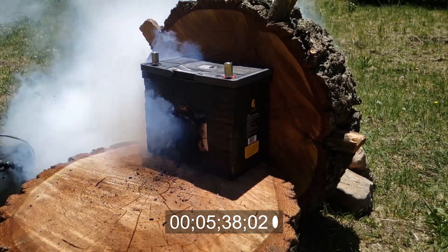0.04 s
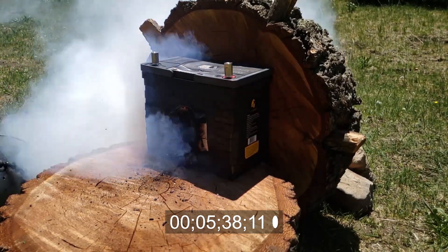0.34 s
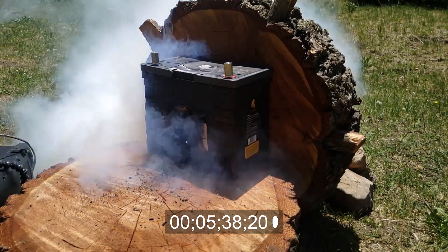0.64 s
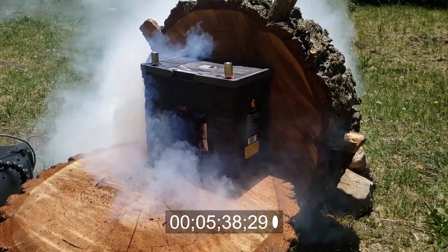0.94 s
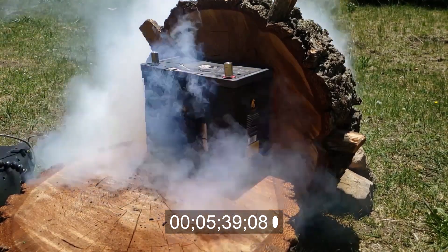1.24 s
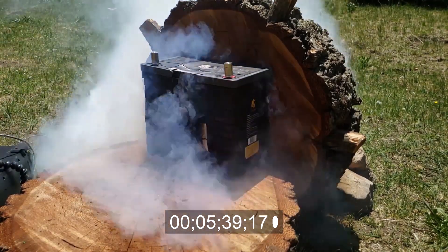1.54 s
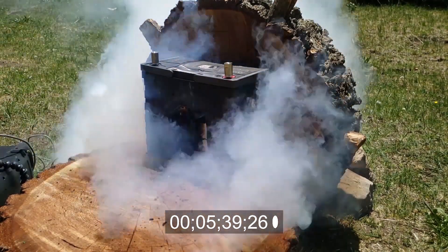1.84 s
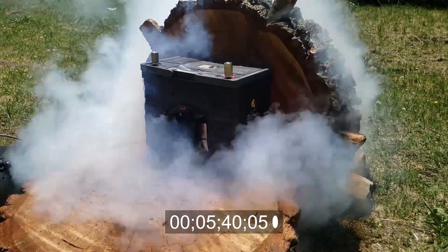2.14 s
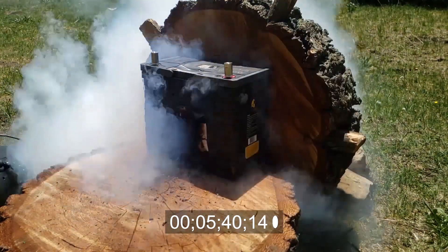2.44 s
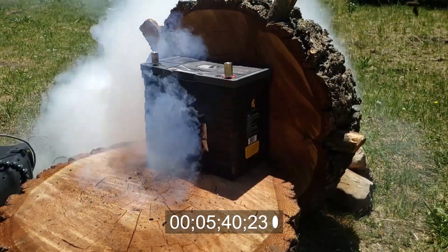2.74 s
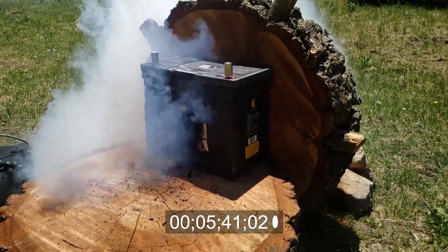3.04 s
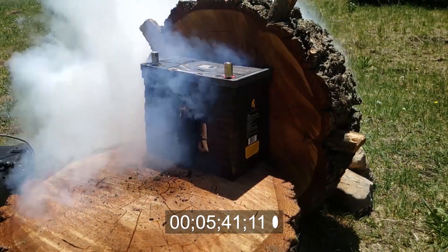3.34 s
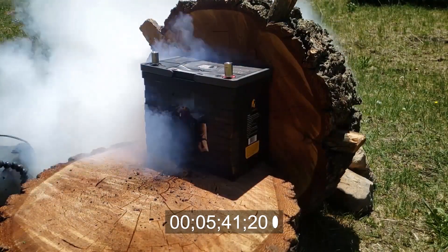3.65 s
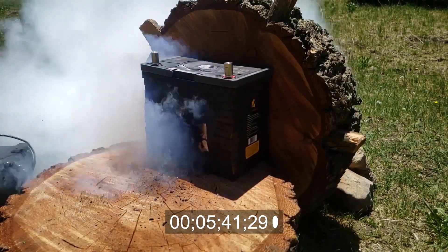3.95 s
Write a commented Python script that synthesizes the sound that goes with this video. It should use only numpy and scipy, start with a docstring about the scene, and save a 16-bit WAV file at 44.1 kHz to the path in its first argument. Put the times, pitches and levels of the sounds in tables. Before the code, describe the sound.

A loud, sputtering hiss of gas from a burning battery jumps up at about 0.1 seconds and continues throughout. A lower roar swells beneath it, easing by 1.4 seconds. Rough, high whistles come and go at different pitches, and from about 3 seconds thinner ones glide downward until the end at 4 seconds. Light wind buffets the microphone with soft, low thumps.

```python
"""Burning battery venting outdoors

Hot gas jets from the cracks in a loud, sputtering hiss whose colour shifts as the jets change.
Under it runs a lower roar that swells in the first second. Narrow gaps sing in rough whistles
that sink toward the end. The hiss reaches the left microphone port first; light wind buffets both."""
import sys
import numpy as np
from scipy import signal
from scipy.fft import rfft, irfft, next_fast_len
from scipy.io import wavfile
from scipy.ndimage import uniform_filter1d, map_coordinates

SR = 44100
rng = np.random.default_rng(int(sys.argv[2]) if len(sys.argv) > 2 else 0)


def transcribe(signal):
    """Save signal, clipped to [-1, 1], as a 16-bit WAV file at the path in sys.argv[1]."""
    frames = np.atleast_2d(signal).T
    limited = np.clip(frames, -1, 1)
    pcm = np.round(limited * 32767).astype(np.int16)
    wavfile.write(sys.argv[1], SR, pcm)


N = 176400
TIME = np.arange(N) / SR


def amp(db):
    """Decibels to gain."""
    return 10 ** (np.asarray(db) / 20)


def unit(x):
    """Scale to rms 1."""
    return x / np.sqrt(np.mean(x ** 2) + 1e-20)


def along(points, hz):
    """Read a curve of (f/Hz, value) points on a log frequency axis."""
    freqs, values = np.transpose(points)
    return np.interp(np.log(hz + 1), np.log(freqs + 1), values)


def curves(rows):
    """One envelope for each column after the time."""
    times, *columns = np.transpose(rows)
    return [np.interp(TIME, times, column) for column in columns]


def wobble(rate_hz):
    """A smooth random modulator with rate_hz knots a second."""
    return map_coordinates(rng.standard_normal(N // 8), [TIME * rate_hz])


def filtered(x, response):
    """Shape x with a complex frequency response."""
    size = next_fast_len(N + 8192)
    return irfft(rfft(x, size) * response(np.fft.rfftfreq(size, 1 / SR)), size)[..., :N]


def rush(spectrum, patchy_db=1.28):
    """Turbulent flow: two unrelated coloured noises with shared, drifting patches of gain."""
    bins = signal.stft(rng.standard_normal((2, N)), nperseg=512)[2]
    patches = uniform_filter1d(rng.standard_normal(bins.shape[1:]), size=8, axis=0)  # across frequency
    patches = uniform_filter1d(patches, size=14, axis=1)  # across time
    pair = signal.istft(bins * amp(patchy_db * unit(patches)), nperseg=512)[1][:, :N]
    return unit(filtered(pair, lambda hz: amp(along(spectrum, hz))))


# Jet colour on either side of the shift: f/Hz, early level/dB, late level/dB
JET_COLOUR = [(1750, -36, -36), (2250, -12.5, -15), (2800, -7.3, -9.5), (3300, -3.1, -4.2),
              (3900, -4.4, -3.5), (4400, -3.0, -5.0), (5200, -7.2, -10.2), (6300, 0.0, -2.0),
              (7150, -4.5, -0.8), (7700, -13.5, -10.9), (8200, -18.2, -17.3), (9000, -13.2, -11.6),
              (10200, -8.2, -6.6), (11550, -16.3, -9.6), (12800, -7.0, -11.3), (14000, -12.4, -10.5),
              (15600, -11.8, -11.7)]
# Crossovers between the four hiss bands: f/Hz
CROSSOVERS = [4700, 7800, 11500]
# Band faders: t/s, low level/dB, middle level/dB, high level/dB, top level/dB
HISS_FADERS = [(0, -29.5, -35.2, -32.7, -32.4), (0.07, -24.7, -29.4, -30.5, -26.8),
               (0.12, -20, -17.8, -15.8, -20.4), (0.33, -20.2, -21.3, -18.0, -19.3),
               (0.58, -22.6, -22.3, -19.5, -19.6), (0.99, -22.6, -20.8, -18.8, -18.3),
               (1.04, -19.2, -16.5, -16, -17.4), (1.22, -18.9, -18.8, -20.4, -21.4),
               (1.62, -20.4, -18.2, -23.1, -21.8), (1.82, -17.6, -19.2, -20.3, -19.2),
               (2.2, -21.3, -20.4, -22.2, -21.8), (2.58, -18.8, -19.6, -21.8, -21),
               (2.85, -20.8, -23.8, -23.0, -23.0), (3.3, -21.8, -22, -23.5, -22.0),
               (3.42, -25, -22.5, -20.1, -22.2), (4, -24.4, -23.5, -24.0, -23.2)]


def hiss(shift_at_s=2.72, shift_lasts_s=.2, sputter_hz=261, flutter_hz=45.06):
    """Gas jets shift colour once; all bands sputter together, and each also flutters on its own."""
    early = rush([(hz, db) for hz, db, _ in JET_COLOUR])
    late = rush([(hz, db) for hz, _, db in JET_COLOUR])
    crossfade = np.clip((TIME - shift_at_s) / shift_lasts_s + .5, 0, 1)
    jet = np.sqrt(1 - crossfade) * early + np.sqrt(crossfade) * late
    sputter_db = .6 * wobble(sputter_hz) + .5 * wobble(flutter_hz)
    edges = [0, *CROSSOVERS, SR]
    out = np.zeros((2, N))
    for low, high, db in zip(edges, edges[1:], curves(HISS_FADERS)):
        band = filtered(jet, lambda hz: (hz >= low) & (hz < high))
        out += band * amp(db + .99 * wobble(flutter_hz))
    return amp(sputter_db) * out


# Body of the plume: f/Hz, level/dB
ROAR_COLOUR = [(120, -15.5), (230, -6), (400, -10.5), (560, -7), (700, 3), (900, -4.5), (1300, -5),
               (1500, -2), (1850, -16), (4400, -32)]


def roar():
    """The plume rushes steadily, a low bed under the hiss."""
    return amp(-38.5) * rush(ROAR_COLOUR)


# Rise and fall of the breeze: t/s, level/dB
BREEZE_FADER = [(0, -35.5), (1.3, -40), (2.5, -46), (2.9, -38.5), (3.4, -50), (3.8, -38)]
# Wind rumble on the ports: f/Hz, level/dB
WIND_COLOUR = [(15, -29), (30, -12), (45, -4.5), (70, -1), (120, -5.5), (260, -19.5), (1200, -58)]


def breeze(lumps_hz=25.2):
    """Light wind buffets the ports with a lumpy rumble, different on each side."""
    rumble = unit(rush(WIND_COLOUR) * amp(-wobble(lumps_hz)))  # lumps of about 1 dB
    return amp(curves(BREEZE_FADER)[0]) * rumble


# Single puffs of wind at their peaks: t/s, level/dB
PUFF_HITS = [(.035, -23.5), (.16, -27), (.365, -28.5), (.77, -31), (1.11, -30), (1.45, -32), (2.72, -31),
             (2.86, -36), (3.15, -34.5), (3.87, -27.5), (3.93, -31)]


def puffs(half_width_s=.025):
    """Short swells of wind thump on both ports at once."""
    eddies = rush(WIND_COLOUR)
    out = np.zeros((2, N))
    for peak_s, db in PUFF_HITS:
        swell = np.exp(-((TIME - peak_s) / half_width_s) ** 2)
        swell_rms = np.sqrt(np.mean(swell ** 2))
        out += amp(db) * swell_rms * unit(swell * eddies)
    return out


# Envelope of the opening gush: t/s, level/dB
GUSH_FADER = [(0.09, -55), (0.135, -24.5), (0.34, -30), (0.55, -30), (1.0, -33), (1.4, -58)]
# Its midrange body: f/Hz, level/dB
GUSH_COLOUR = [(150, -13), (480, -9), (600, 3), (1130, -2), (1900, -20), (4000, -50)]


def gush():
    """A broad gush of gas swells the roar, holds for about a second and falls away."""
    return amp(curves(GUSH_FADER)[0]) * rush(GUSH_COLOUR)


def singing_gap(pitch_hz, width_hz, waver_hz=35, waver_share=.006, waver_db=1.2):
    """Turbulence in a narrow resonance makes a rough tone; unsteady flow sways pitch and level as one."""
    lowpass = signal.butter(2, width_hz / 2, fs=SR, output="sos")
    roughness = signal.sosfilt(lowpass, rng.standard_normal((2, 2, N)))
    flow = wobble(waver_hz)
    phase = 2 * np.pi * np.cumsum(pitch_hz * (1 + waver_share * flow)) / SR
    tone = roughness[0] * np.cos(phase) + roughness[1] * np.sin(phase)
    return unit(amp(waver_db * flow) * tone)


# Cues for the singing gaps: start t/s, end t/s, f/Hz, width/Hz, level/dB
WHISTLE_CUES = [(.10, .19, 5450, 700, -22.5), (.12, 1.0, 3280, 350, -35.5), (.46, .505, 9800, 800, -26.5),
                (1.02, 1.70, 6400, 500, -22.4), (1.02, 1.58, 2350, 300, -36),
                (1.72, 2.28, 4400, 500, -27.8), (1.72, 2.65, 6650, 650, -29), (2.36, 2.92, 3280, 600, -31),
                (2.88, 3.10, 7000, 700, -24.5), (3.03, 3.13, 11000, 450, -30.5),
                (3.22, 3.40, 6620, 650, -23), (3.32, 3.52, 9900, 1200, -31.5),
                (3.72, 3.86, 11100, 500, -31.5)]


def held_whistles(fade_s=.02):
    """Each gap sings around one pitch for a while, then falls silent."""
    out = np.zeros((2, N))
    for start, end, hz, width_hz, db in WHISTLE_CUES:
        gate = np.clip(np.minimum(TIME - start, end - TIME) / fade_s + .5, 0, 1)
        out += amp(db) * gate * singing_gap(hz, width_hz)
    return out


# Paths of the three closing whistles: t/s, f/Hz, level/dB
HIGH_GLIDE = [(2.78, 7200, -60), (2.86, 7270, -30), (3.07, 7400, -23.3), (3.28, 7300, -28),
              (3.43, 7180, -38), (3.74, 7020, -34), (4, 6680, -36)]
LOW_GLIDE = [(3.01, 3620, -42), (3.08, 3720, -27.5), (3.18, 3350, -39), (3.35, 3000, -35),
             (3.44, 2950, -65)]
MID_GLIDE = [(3.66, 5750, -42), (3.88, 5450, -28.5), (4, 5420, -29.5)]


def sinking_whistles():
    """Three gaps come in one after another with thin whistles that end by gliding down."""
    out = np.zeros((2, N))
    for glide, width_hz in (HIGH_GLIDE, 230), (LOW_GLIDE, 230), (MID_GLIDE, 140):
        hz, db = curves(glide)
        gate = TIME > glide[0][0]
        out += amp(db) * gate * singing_gap(hz, width_hz)
    return out


# How alike the two ports sound: f/Hz, coherence/0-1
PORT_COHERENCE = [(1400, 0.97), (1900, 0.65), (2500, 0.88), (6800, 0.91), (8400, 0.55), (10200, 0.85),
                  (12800, 0.72), (14200, 0.3)]
# Pan, left minus right: f/Hz, level/dB
PORT_BALANCE = [(400, 1.9), (800, 3), (1400, -0.5), (2100, 6.5), (3000, 1.5), (3500, -2), (4400, 0.5),
                (5400, 5.5), (7100, 1), (8000, 0.5), (9500, 2), (15500, 1.5)]
# How far the left port leads: f/Hz, phase/rad
LEFT_LEAD = [(1200, 0.25), (1900, 1.1), (3200, 0.9), (4000, 2.4), (6000, 2.9), (7000, 3.8), (8400, 2.8),
             (11000, 6.9), (12800, 6.1), (15200, 8.1)]


def ports(pair):
    """Direct sound is the mid, scattered sound the side; the left port leads and is mostly louder."""
    def split(hz):
        angle = np.arccos(np.clip(along(PORT_COHERENCE, hz), 0, 1)) / 2
        return np.array([np.cos(angle), np.sin(angle)])

    def pan(hz):
        sides = np.array([[.5], [-.5]])
        return amp(sides * along(PORT_BALANCE, hz)) * np.exp(1j * sides * along(LEFT_LEAD, hz))

    direct, scattered = filtered(pair, split)
    return filtered(np.array([direct + scattered, direct - scattered]), pan)


def scene():
    """The venting gas spread across the ports, with the wind leaning slightly right."""
    vent = hiss() + held_whistles() + sinking_whistles() + roar() + gush()
    wind = puffs() + breeze()
    return ports(vent) + wind * amp([[-1], [1]])


def record(dry, top_hz=15800):
    """A brick-wall low-pass takes off the highest air."""
    return filtered(dry, lambda hz: hz < top_hz)


dry = scene()
out = record(dry)
transcribe(out)
```